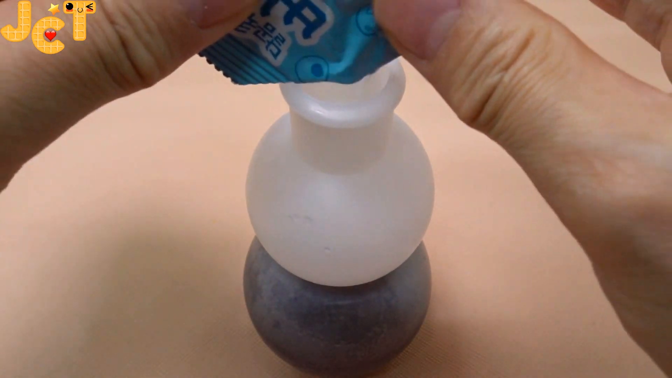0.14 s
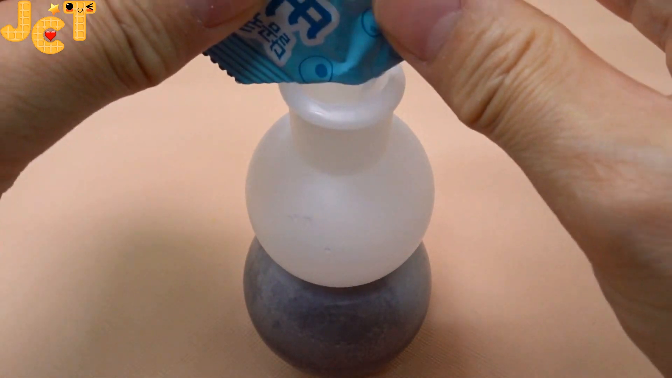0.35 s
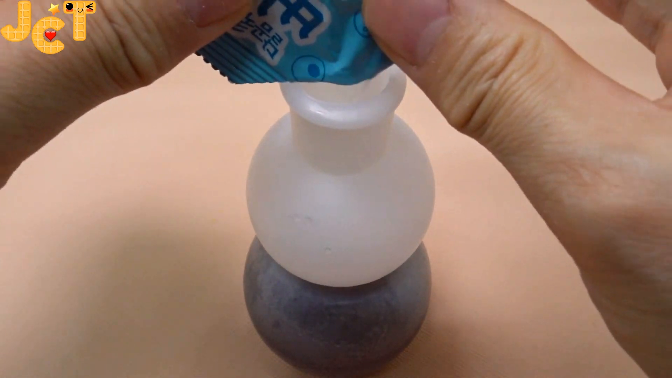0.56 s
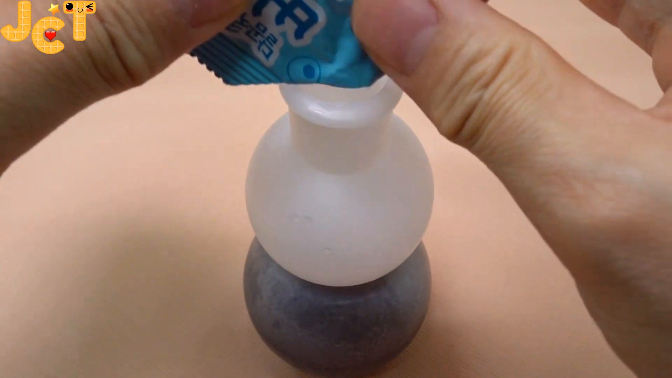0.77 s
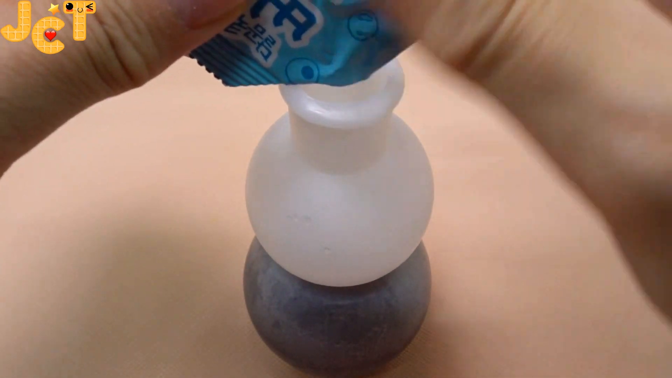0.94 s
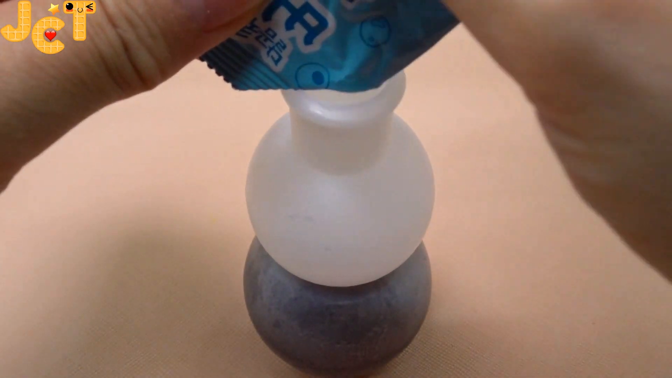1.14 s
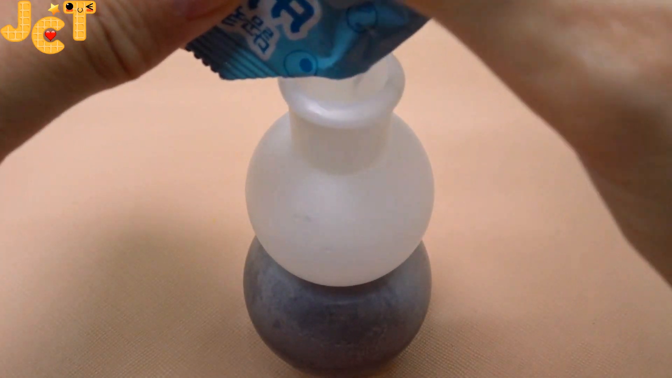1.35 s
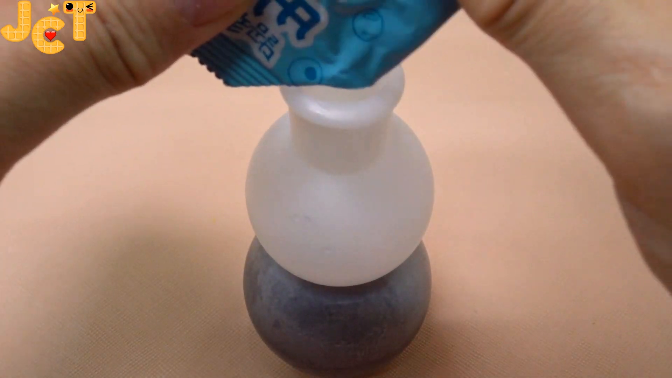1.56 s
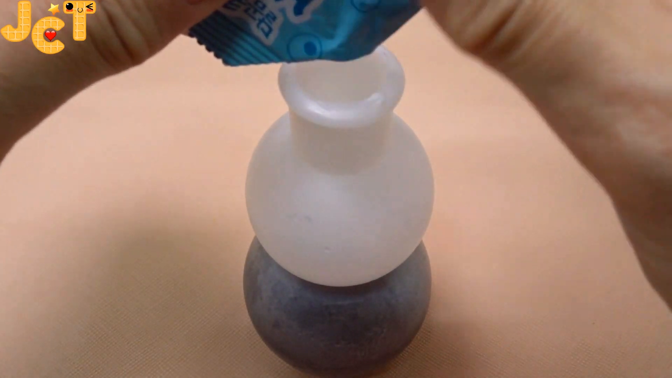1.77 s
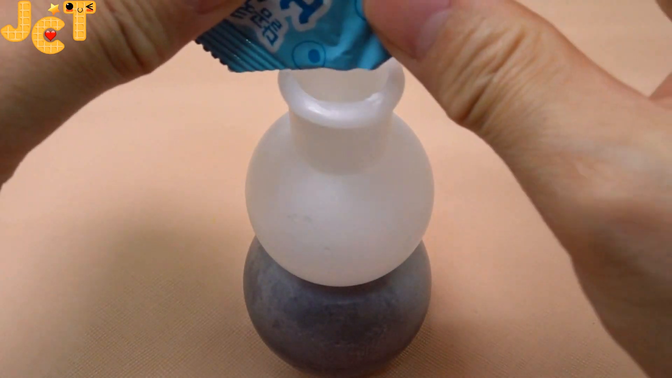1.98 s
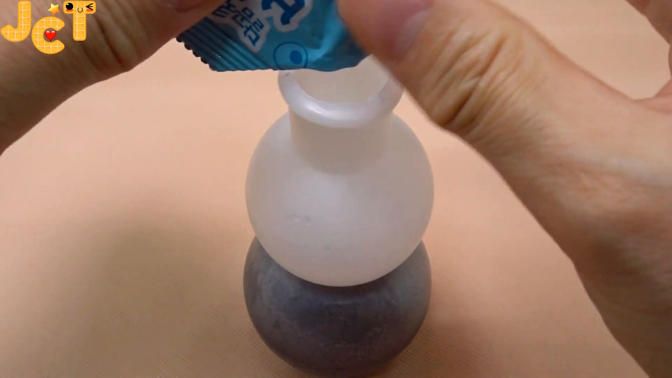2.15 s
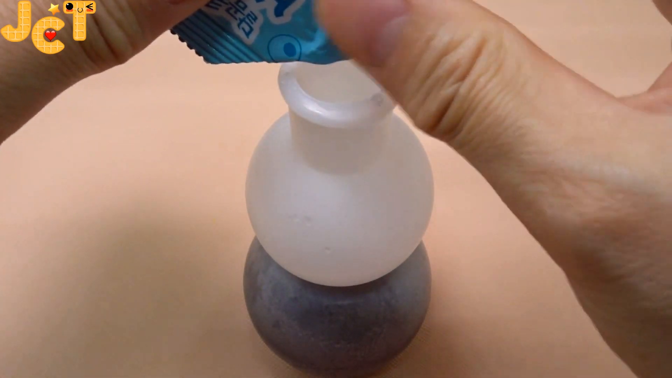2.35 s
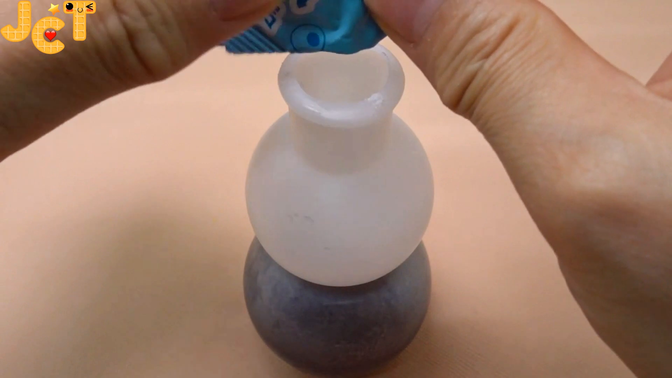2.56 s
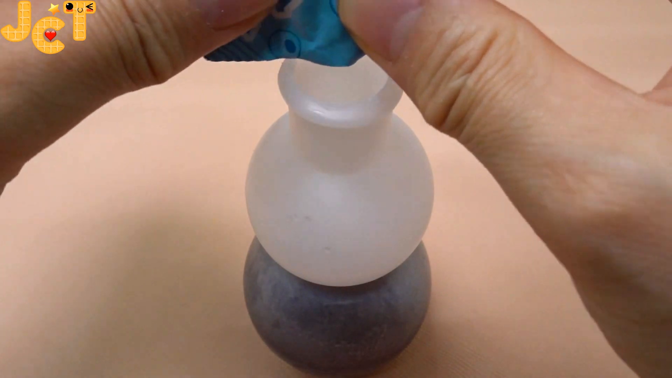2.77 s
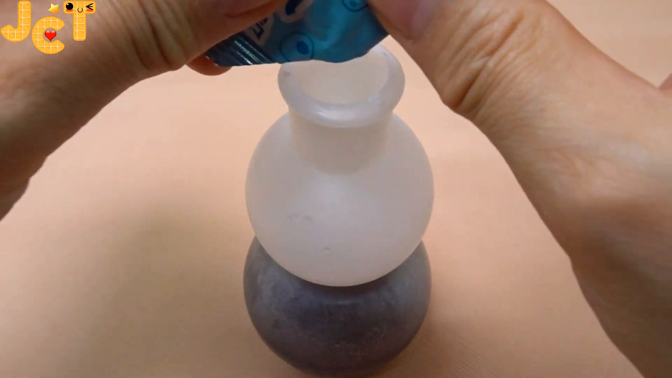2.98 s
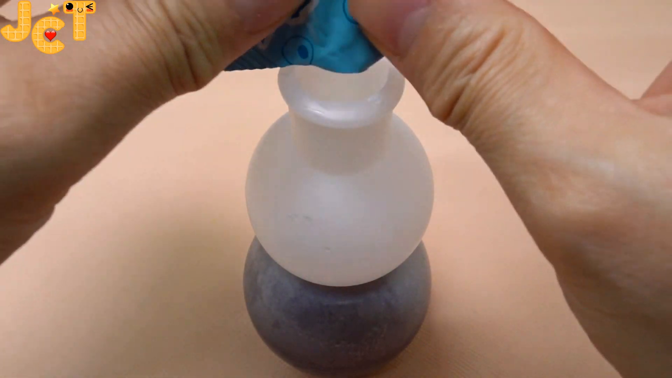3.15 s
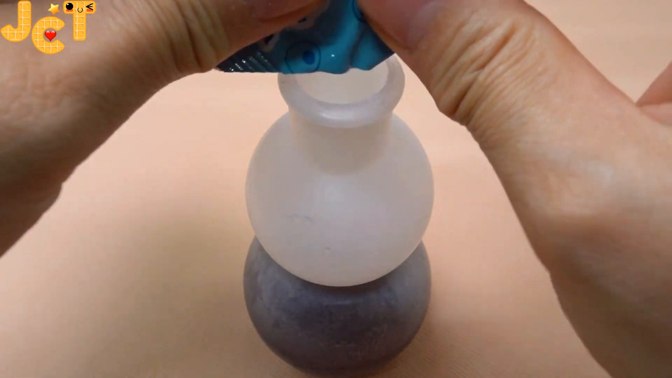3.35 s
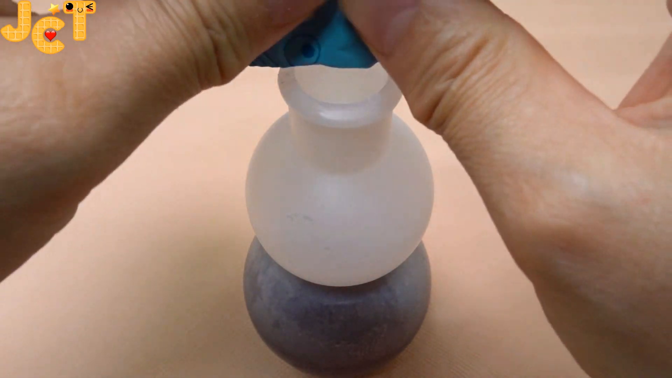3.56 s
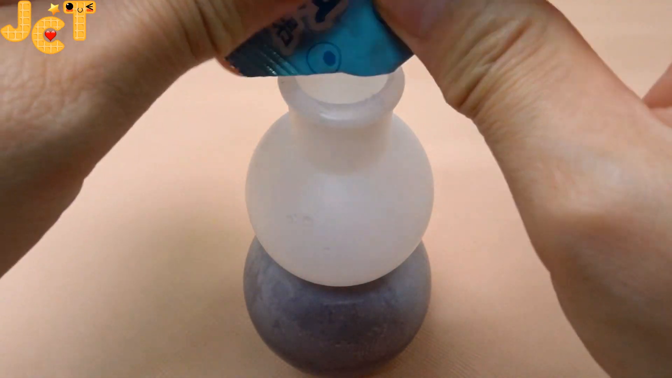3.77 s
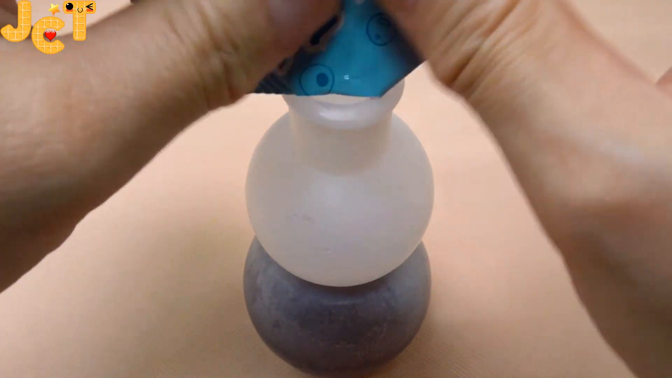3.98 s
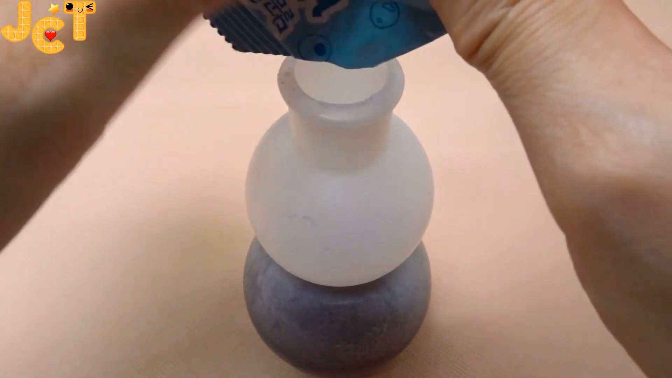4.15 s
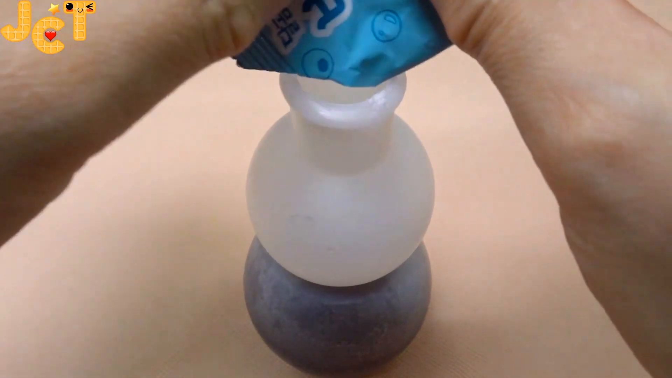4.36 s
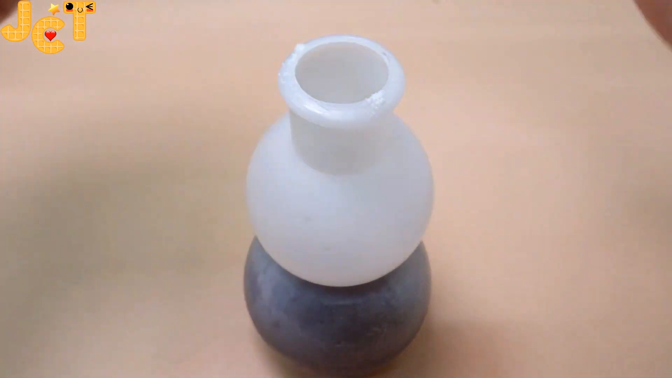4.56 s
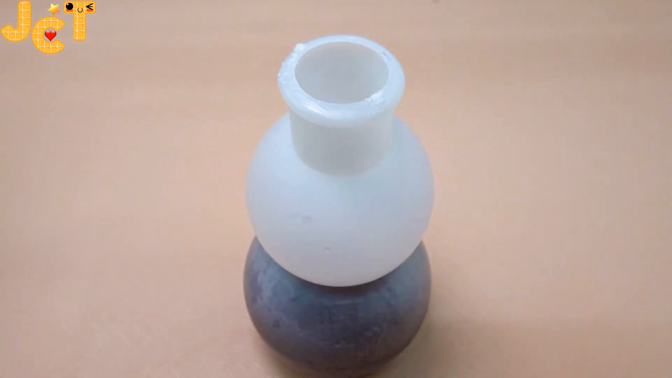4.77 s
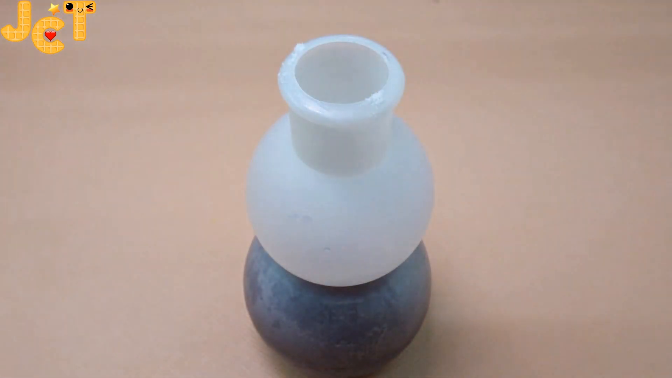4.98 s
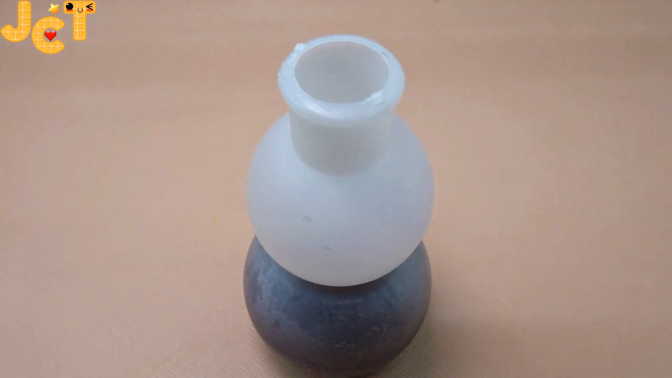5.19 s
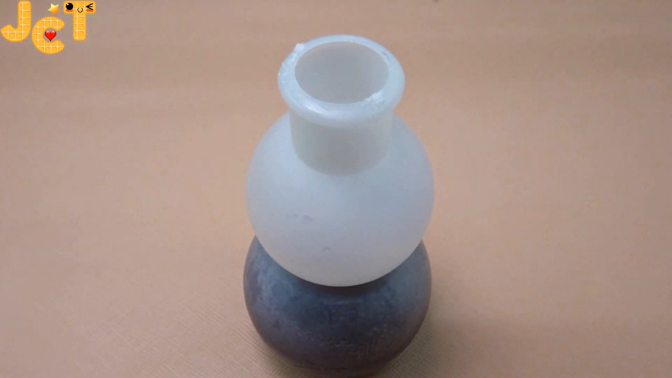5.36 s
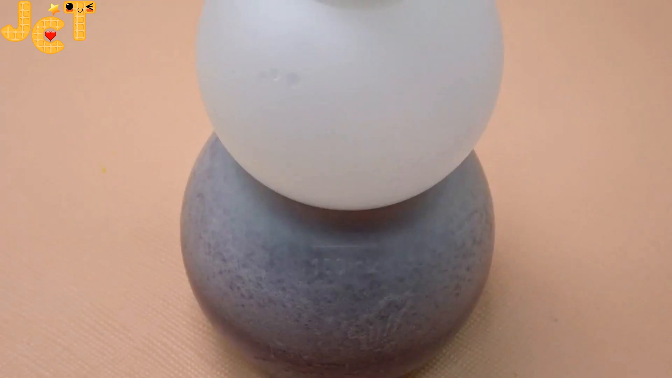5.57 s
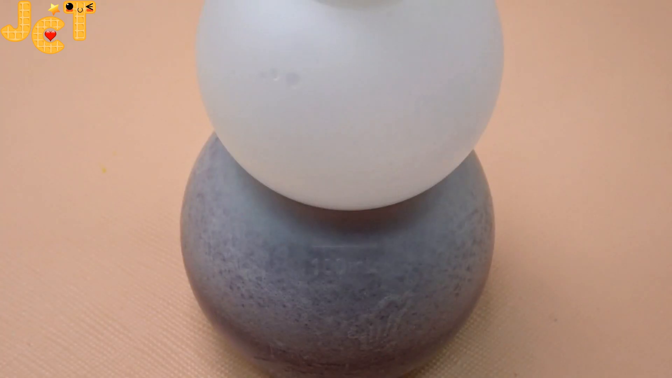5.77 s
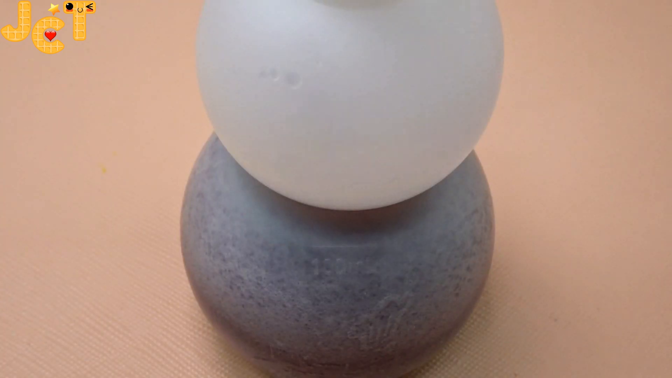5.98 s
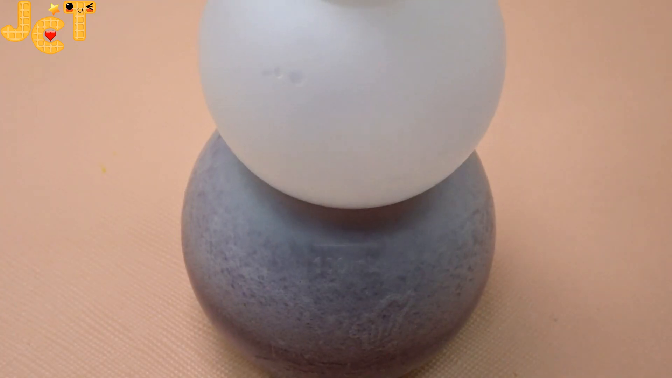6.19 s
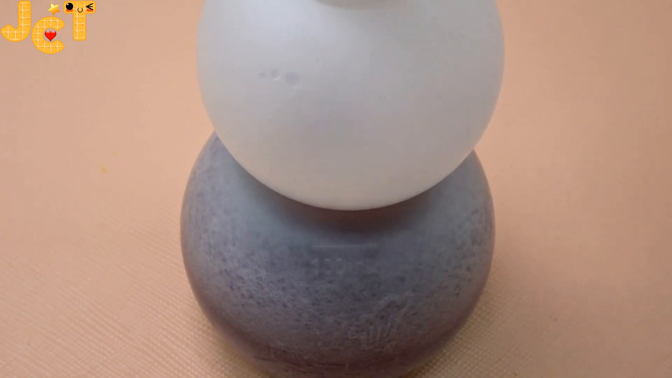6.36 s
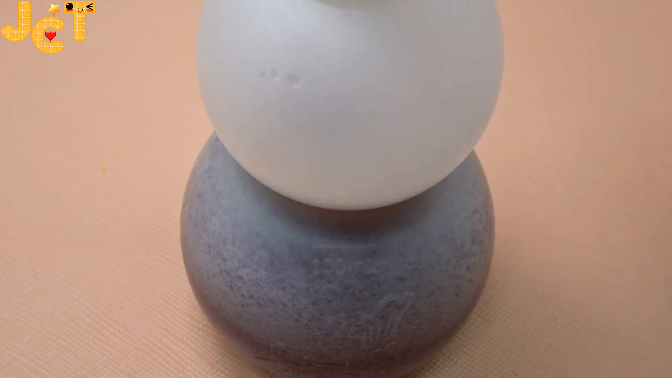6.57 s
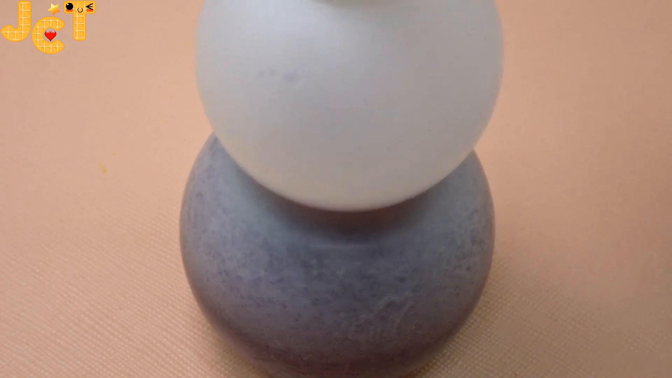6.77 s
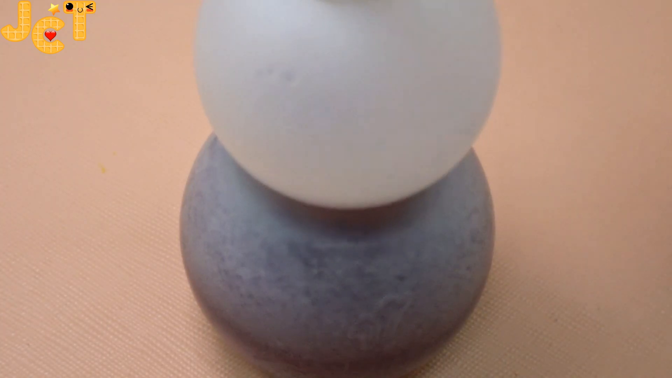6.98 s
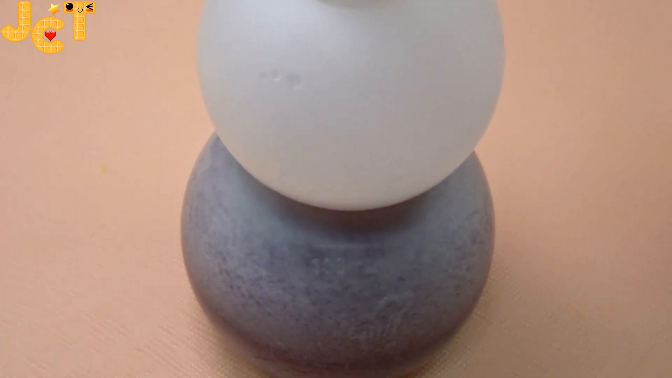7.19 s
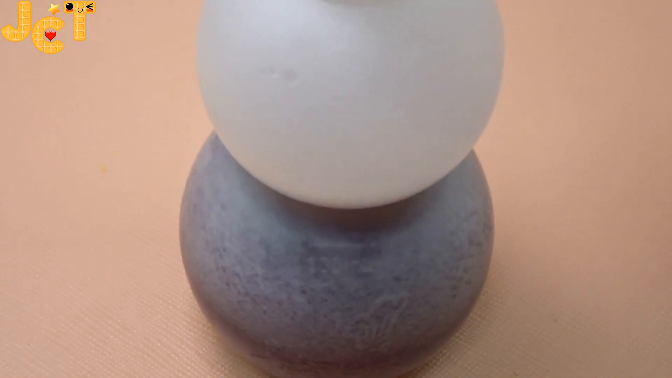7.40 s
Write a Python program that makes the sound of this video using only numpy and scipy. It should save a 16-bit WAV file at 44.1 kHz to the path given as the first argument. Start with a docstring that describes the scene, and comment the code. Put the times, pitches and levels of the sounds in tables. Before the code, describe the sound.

A plastic sachet crinkles and snaps close by as fine powder ticks into a small hollow flask, then quiet room hum with faint scrapes.

```python
"""A plastic sachet is shaken and squeezed over a small plastic flask, close to the microphones, in a quiet room.
From the start, room noise hums softly, loose powder trickles as random tiny ticks, and creases snap as short cracks.
Soon the sachet bumps the rim with damped taps, and spurts of powder ring the flask through its air resonances.
From 2.4 s small creases crackle densely until 4.5 s, and the last clear snap comes at 4.8 s.
At 5.6 s the level dips briefly; from 6 s the camera is shifted, with faint filtered scrapes and soft knocks."""
import sys
import numpy as np
from scipy import signal
from scipy.fft import rfft, irfft, next_fast_len
from scipy.io import wavfile

SR = 44100
rng = np.random.default_rng(int(sys.argv[2]) if len(sys.argv) > 2 else 0)


def to_wav(sig):
    """Store sig (one row per channel, or 1-D mono) as 16-bit WAV at the path in sys.argv[1].

    Samples outside -1..1 are clipped; the rate is SR.
    """
    pcm = np.clip(np.atleast_2d(sig), -1, 1) * 32767
    pcm = np.round(pcm).astype(np.int16)
    wavfile.write(sys.argv[1], SR, pcm.T)  # frames by channels


N = 327663
TIME = np.arange(N) / SR


def undb(db):
    """Turn decibels into gain."""
    return 10 ** (np.asarray(db) / 20)


def unit(x):
    """Scale to an rms (average strength) of 1."""
    return x / np.sqrt(np.mean(x ** 2))


def fade(t, t60):
    """Die away smoothly, losing 60 dB in t60 seconds."""
    return np.exp(-np.log(1000) * t / t60)


def add(out, s, x):
    """Mix x into out from time s."""
    i = int(np.clip(round(s * SR), 0, N - 1))
    out[..., i:i + x.shape[-1]] += x[..., :N - i]


def colour(x, points):
    """Shape the tone along (Hz, dB) points, with a filter that responds only after its input."""
    hz, db = np.transpose(points)
    size = next_fast_len(x.shape[-1] + 4096, True) // 2 * 2
    freq = np.maximum(np.arange(size // 2 + 1) * SR / size, 1)
    level_db = np.interp(np.log(freq), np.log(hz), db)
    # folding the cepstrum onto positive times keeps the response from starting early
    cepstrum = irfft(np.log(undb(level_db)))
    cepstrum[1:size // 2] *= 2
    cepstrum[size // 2 + 1:] = 0
    response = np.exp(rfft(cepstrum))
    return irfft(rfft(x, size) * response)[..., :x.shape[-1]]


def band(x, hz, width):
    """One resonance, gain 1 at its centre."""
    hz, width = min(hz, .45 * SR), min(width, .3 * SR)
    b, a = signal.iirpeak(hz, hz / width, fs=SR)
    return signal.lfilter(b, a, x)


def body(x, modes):
    """Several resonances of one object, ringing side by side."""
    return sum(undb(db) * band(x, hz, width) for hz, width, db in modes)


def stereo(mid, side, width, corner_hz):
    """Two close microphones hear the same bass but different treble."""
    b, a = signal.butter(1, min(corner_hz, SR / 3), "high", fs=SR)
    side = signal.lfilter(b, a, side)
    return mid + width * np.array([[1], [-1]]) * side


def grains(rate, spread_db):
    """Random tiny impacts of uneven size, rate per second; mean power 1 whatever their rate."""
    hit = rng.random(N) < rate / SR
    draw = rng.uniform(-1, 1, N)
    # many small grains, few large ones
    size = undb(abs(spread_db) * np.minimum(-np.log(abs(draw[hit])), 3))
    out = np.zeros(N)
    out[hit] = unit(size) * np.sign(draw[hit])
    return out * np.sqrt(SR / rate)


def knock(hz, t60, rough):
    """A soft blow: one damped swing and a dull rattle around its pitch."""
    t = np.arange(SR // 2) / SR
    noise = rng.standard_normal(len(t))
    rattle = unit(band(band(noise, hz, hz), hz, 2 * hz))
    soft_start = 1 - fade(t, 0.0013)
    return (np.sin(2 * np.pi * hz * t) + rough * rattle) * fade(t, t60) * soft_start


# tone of the still room, relative: (frequency [Hz], level [dB])
ROOM_NOISE = [(20, -17), (45, -9), (76, -8.5), (145, -2), (190, -8.5), (250, -5.5), (480, -8), (750, -14.5),
              (1300, -18), (4000, -23.5), (13000, -31.5), (16000, -45)]


def air(noise_db=-54.5, hum_hz=143, hum_db=-76, apart_db=-18):
    """Steady room noise is filtered hiss; a narrow resonance of noise makes a faint, unsteady hum."""
    mid, side, left, right = colour(rng.standard_normal((4, N)), ROOM_NOISE)
    # a little noise is separate in each microphone
    noise = stereo(mid, side, width=1.0, corner_hz=1700) + undb(apart_db) * np.array([left, right])
    hum = unit(band(band(rng.standard_normal(N), hum_hz, 10), hum_hz, 10))
    return undb(noise_db) * unit(noise) + undb(hum_db) * hum


# larger spurts of powder and rustling film, levels before each player's trim:
# (time [s], length [s], crackle level [dB], flask ring level [dB])
LARGE_SPURTS = [(0.314, 0.073, -45.5, -46), (0.736, 0.047, -43.5, -49), (1.043, 0.019, -34, -27.5),
                (1.317, 0.087, -40.5, -36), (1.451, 0.013, -24.5, -32), (1.744, 0.054, -30.5, -30.5),
                (1.91, 0.015, -28, -28), (1.97, 0.032, -41, -61), (2.071, 0.046, -39, -40),
                (2.265, 0.03, -35.5, -29.5), (2.372, 0.033, -42, -50), (2.493, 0.012, -32.5, -36),
                (2.85, 0.076, -34.5, -36), (3.025, 0.07, -37.5, -49.5), (3.115, 0.021, -28.5, -43),
                (3.217, 0.012, -25, -49), (3.26, 0.029, -24.5, -49), (3.353, 0.03, -31, -56),
                (3.511, 0.025, -37.5, -52.5), (3.582, 0.094, -36.5, -60), (3.803, 0.11, -39.5, -53.5),
                (3.933, 0.06, -30, -58.5), (4.046, 0.075, -30.5, -40), (4.144, 0.067, -25, -26.5),
                (4.199, 0.03, -27.5, -33.5), (4.365, 0.05, -35, -46), (4.45, 0.057, -30.5, -51),
                (4.575, 0.029, -36, -28)]


def spurts(lag_s=0.00402, length_s=0.01986, spill_db=-5, spill_ring_db=-5.0):
    """Powder slides in large spurts; each bump also shakes loose a small one to match its strength."""
    small = [(s + lag_s, length_s, db + spill_db, db + spill_ring_db) for s, db, _ in RIM_BUMPS]
    return list(LARGE_SPURTS) + small


def swell(t, length):
    """Strength of one shake around its peak: a quick rise and fall."""
    return np.exp(-np.minimum(abs(1.8 * t / length), 20) ** 1.5)


# powder trickling between the spurts: (time [s], level [dB])
TRICKLE_LEVEL = [(0, -62), (1.15, -56.5), (1.6, -83.5), (2.45, -65), (2.8, -47.5), (3.15, -57),
                 (3.6, -47.5), (4.3, -57.5), (4.7, -55), (4.85, -77.5)]
# tone of the powder's crackle, relative: (frequency [Hz], level [dB])
CRACKLE_TONE = [(60, -23.5), (250, 0), (700, -20.5), (1200, -7.5), (1800, -4), (2700, -0.5), (4200, 0),
                (6500, -2.5), (10000, -1), (13000, -6.5), (16000, -19)]
# air resonances of the flask, the first one in its neck: (frequency [Hz], width [Hz], relative level [dB])
FLASK_AIR = [(890.5, 168, 8), (1510, 174, 6), (2035, 270, 5), (2487, 200, -6), (2965, 340, 0.5),
             (3950, 510, -10.5), (4830, 85, -26)]


def powder(crackle_db=-3.5, ring_db=-6, bed_db=-13, full_rate=2200, own_db=1):
    """Grains slide over the film and patter into the flask, where they stir the air in its neck."""
    # flow and stir are powers: of the crackle, and of the patter in the flask
    flow = undb(np.interp(TIME, *np.transpose(TRICKLE_LEVEL))) ** 2
    stir = np.zeros(N)
    for s, length, db, flask_db in spurts():
        span = slice(max(int((s - .25) * SR), 0), int((s + .25) * SR))
        shake = swell(TIME[span] - s, length) ** 2
        flow[span] += shake * undb(db + crackle_db) ** 2
        stir[span] += shake * undb(flask_db + ring_db) ** 2
    # a thin trickle is single ticks, a full flow a dense crackle
    rate = full_rate * np.clip(flow / undb(-36.5) ** 2, 1e-4, 1) ** .33
    layers = []
    for _ in range(2):
        # grains of different sizes tick at different pitches
        ticks = np.zeros(N)
        for hz in np.geomspace(1600, 13000, num=6):
            ticks += unit(band(grains(rate / 3, spread_db=4), hz, hz / 4)) * np.sqrt(hz)
        clicks = grains(rate, spread_db=0.5)
        hiss = undb(bed_db) * rng.standard_normal(N)
        layers.append(clicks + undb(own_db) * unit(ticks) + hiss)
    crackle = colour(stereo(*layers, width=0.23, corner_hz=4500), CRACKLE_TONE)
    crackle = unit(crackle) * np.sqrt(flow)
    hz, width, _ = FLASK_AIR[0]
    patter = grains(rate=2500, spread_db=6.5)
    neck = band(patter * np.sqrt(stir), hz, width) / np.std(band(patter, hz, width))
    return crackle, neck


# tone of the room's echo, relative: (frequency [Hz], level [dB])
ECHO_TONE = [(100, -1.5), (300, 5), (800, 2.5), (3000, -5.5), (7000, -8), (16000, -5.5)]


def room(x, wet_db=-18.5, t60=0.47):
    """Walls a few metres off return a soft, late echo, diffuse in the treble."""
    t = np.arange(int(.6 * SR)) / SR
    tail = stereo(*colour(rng.standard_normal((2, len(t))), ECHO_TONE), width=1, corner_hz=454)
    tail *= fade(t, t60) * (1 - fade(t, 0.063))
    tail *= undb(wet_db) / np.sqrt(np.sum(tail ** 2) / 2)
    return signal.fftconvolve(x, tail, axes=1)[:, :N]


# the clearest creases snapping: (time [s], level before the crack's trim [dB], pitch of the facet [Hz])
CLEAR_SNAPS = [(0.0155, -27.5, 4000), (0.1011, -37.5, 3650), (0.1528, -39, 3630), (0.207, -26, 8260),
               (0.2875, -30, 4000), (0.3005, -32, 4100), (0.3262, -24, 8700), (0.399, -34, 5260),
               (0.4119, -23, 6600), (0.494, -32.5, 2130), (0.5179, -26, 10000), (0.5263, -23.5, 4840),
               (0.623, -24, 5240), (0.6332, -29.5, 8550), (0.6545, -24.5, 6950), (0.707, -28.5, 6540),
               (0.747, -23.5, 5950), (0.8459, -19, 10600), (0.8822, -27, 6800), (0.9092, -30, 8240),
               (1.027, -35, 10600), (1.0416, -24, 11100), (1.2674, -28, 4000), (1.2747, -27.5, 1860),
               (1.2789, -25, 5830), (1.3014, -24, 8400), (1.35, -39.5, 2100), (1.4414, -30, 10300),
               (1.4514, -20, 6400), (1.7133, -27, 8200), (1.734, -20.5, 8260), (1.7668, -17.5, 10100),
               (1.787, -23, 3900), (1.8057, -19.5, 3240), (1.903, -21, 11900), (1.9108, -18, 13000),
               (1.9252, -24.5, 11900), (1.9815, -25.5, 7100), (1.994, -24.5, 7100), (2.0284, -23, 4500),
               (2.0505, -18.5, 11700), (2.0887, -13.5, 8800), (2.105, -30, 1400), (2.177, -45, 4970),
               (2.2794, -18.5, 9400), (2.35, -30, 10800), (2.446, -42.5, 7060), (2.4915, -21, 9700),
               (2.5232, -30, 6250), (2.5714, -25.5, 7550), (2.625, -30, 6860), (2.6756, -25, 5200),
               (2.7087, -23.5, 9900), (2.7785, -21.5, 4160), (2.8221, -19.5, 4900), (2.8452, -20, 4500),
               (2.8766, -19.5, 6800), (2.889, -24.5, 6400), (2.9337, -28.5, 4500), (2.9518, -22, 11900),
               (2.9779, -20, 9000), (2.9988, -18, 7500), (3.0113, -13.5, 3900), (3.0347, -15.5, 2600),
               (3.05, -22, 5000), (3.101, -25, 10100), (3.12, -15.5, 11300), (3.22, -16, 4500),
               (3.264, -17.5, 3350), (3.27, -18.5, 7560), (3.2963, -26, 3400), (3.337, -25.5, 10600),
               (3.362, -12.5, 6560), (3.3884, -16.5, 2680), (3.437, -16.5, 9700), (3.4586, -17.5, 4950),
               (3.505, -20.5, 3950), (3.5124, -24, 2880), (3.568, -18, 7250), (3.5914, -15, 8900),
               (3.5991, -16.5, 9200), (3.6139, -17.5, 12000), (3.6386, -22, 3900), (3.674, -22, 6840),
               (3.691, -21, 3750), (3.7541, -24, 5000), (3.7903, -22, 5400), (3.8031, -21, 8700),
               (3.8347, -29, 8900), (3.857, -24.5, 5700), (3.9112, -16, 6660), (3.9278, -18, 7630),
               (3.9476, -13, 9400), (4.0218, -19, 3840), (4.0492, -16, 4030), (4.0688, -15.5, 9050),
               (4.102, -12, 9100), (4.135, -12, 6900), (4.1423, -15.5, 3970), (4.1562, -16.5, 4430),
               (4.186, -15, 8650), (4.2307, -22, 6150), (4.2751, -18.5, 4750), (4.341, -14.5, 10000),
               (4.3654, -16.5, 7000), (4.374, -18.5, 8700), (4.4084, -21.5, 10600), (4.4291, -21.5, 4840),
               (4.4542, -16, 3020), (4.4962, -23, 5700), (4.5804, -25, 3930), (4.6767, -43.5, 4900),
               (4.803, -39, 5800)]


def creases(count=2, lag_s=.001, spread_s=.0055, neighbour_db=-12.5, uneven_db=3.5, spurt_db=0,
            squeeze_db=-38, squeeze_s=(2.4, 4.51), small_hz=6800, octaves=.6, size=60):
    """Snaps set off weaker neighbours; small creases give way in every large spurt and all through the squeeze."""
    def pitch(chance):
        """A random pitch for a small crease."""
        return np.clip(small_hz * 2 ** (octaves * chance), 1400, 13000)

    rows = list(CLEAR_SNAPS)
    for (s, db, _), draws in zip(CLEAR_SNAPS, rng.standard_normal((len(CLEAR_SNAPS), count, 3))):
        for a, b, c in draws:
            near_s = max(s + lag_s + spread_s * a, spread_s)
            rows.append((near_s, db + neighbour_db + uneven_db * b, pitch(c)))
    for (s, length, db, _), draws in zip(LARGE_SPURTS, rng.standard_normal((len(LARGE_SPURTS), count, 3))):
        for a, b, c in draws:
            rows.append((s + length / 2 * np.tanh(a), db + spurt_db + uneven_db * b, pitch(c)))
    # the squeeze spreads its creases almost evenly
    for k, (a, b, c) in enumerate(rng.standard_normal((size, 3))):
        s = np.interp(k + a / 2, (0, size), squeeze_s)
        rows.append((s, squeeze_db + uneven_db * b, pitch(c)))
    return rows


# tone of the fluttering film sheet, relative: (frequency [Hz], level [dB])
SHEET_TONE = [(150, -14.5), (500, -8.5), (1100, -1.5), (1800, -8.5), (2800, -3.5), (4200, -1.5),
              (6500, -4.5), (10000, -2.5), (13000, -2), (16000, -15.5)]
# a snap at SNAP_DB has flutter at FLUTTER_DB beside it; harder snaps are drier (dB of flutter lost per dB)
SNAP_DB, FLUTTER_DB, DRYNESS = -22, -2, 0.27
FILM_PAN_DB = 1.1  # the film leans this much to the left on average


def snaps(damping=0.82, film_hz=11000, flutter_t60=0.025, facet_db=0, facet_width=0.16, snap_db=3.0,
          creak_db=-4, scatter_db=6.0):
    """A crease creaks as it buckles, gives one sharp crack, and the sheet flutters on for some milliseconds."""
    out, t = np.zeros((2, N)), np.arange(2048) / SR
    sheet = colour(rng.standard_normal((2, N // 4)), SHEET_TONE)
    sheet = unit(stereo(*sheet, width=0.54, corner_hz=5600))
    pulse = colour(1. * (t == 0), [(200, -2.5), (1500, -0.5), (14000, -2), (16500, -3.5), (18000, -12.0)])
    rows = creases()
    for (s, db, hz), (start, sign, pan, shape) in zip(rows, rng.random((len(rows), 4))):
        i = int(start * (N // 4 - len(t)))
        flutter = sheet[:, i:i + len(t)]
        # every facet has its own pitch and, by its shape, its own overtone
        facet = unit(band(flutter, hz, facet_width * hz))
        overtone = unit(band(flutter, min(hz * (1.3 + shape), 15000), facet_width * hz))
        # the crack's pitch lies between facet and film; it bounces between the folds for a few milliseconds
        crack_hz = np.sqrt(hz * film_hz)
        rattle = unit(band(flutter, crack_hz, crack_hz) + .4 * facet) * fade(t, .0035)
        click = np.sign(sign - .5) * unit(band(pulse, crack_hz, damping * crack_hz))
        crack = unit(click + unit(rattle))
        # as much energy as one millisecond of steady sound
        crack = undb(snap_db) * crack * np.sqrt(SR / 1000 / len(t))
        flutter = unit(flutter + undb(facet_db) * (facet + .5 * overtone))
        flutter = undb(FLUTTER_DB - DRYNESS * (db - SNAP_DB)) * flutter
        pan_db = FILM_PAN_DB + scatter_db * (2 * pan - 1)
        gain = undb(db + np.array([[.5], [-.5]]) * pan_db)
        add(out, s, gain * (crack + flutter * fade(t, flutter_t60)))
        # the creak grows until the crack
        lead = min(len(t), int(s * SR))
        creak = (flutter * fade(t[::-1], 0.0096))[:, -lead:]
        add(out, s - lead / SR, gain * undb(creak_db) * creak)
    return out


# shakes that bump the sachet against the flask: (time [s], level before trims [dB], pitch [Hz])
RIM_BUMPS = [(0.093, -41, 400), (0.199, -39, 355), (0.281, -39, 410), (0.411, -36, 374), (0.431, -44, 380),
             (0.477, -41.5, 390), (0.631, -41, 306), (0.686, -45, 424), (0.842, -33.5, 397),
             (0.914, -37, 552), (1.048, -39, 316), (1.091, -38, 302), (1.276, -37.5, 472),
             (1.454, -36, 437), (1.749, -36.5, 510), (1.805, -40, 426), (1.913, -31, 428),
             (1.983, -38.5, 335), (2.053, -38.5, 496), (2.134, -39.5, 280), (2.268, -36, 300),
             (2.346, -41.5, 420), (2.493, -31, 325), (2.56, -34, 368), (2.719, -32.5, 316),
             (2.772, -39, 288), (3.011, -35, 363), (4.193, -30, 395), (4.589, -34, 295)]


def bumps(bump_db=4.0, t60=0.055, thud_db=-11, thud_hz=240, rustle_db=-1, rustle_t60=0.035):
    """Dull taps of the sachet against the rim; the flask thuds on the table below and the film rustles."""
    out, t = np.zeros(N), np.arange(SR // 2) / SR
    for s, db, hz in RIM_BUMPS:
        tap = knock(hz, t60, rough=1.0)
        thud = undb(thud_db) * knock(thud_hz, t60, rough=1)
        rustle = unit(colour(rng.standard_normal(len(t)), SHEET_TONE)) * fade(t, rustle_t60)
        add(out, s - .002, undb(db + bump_db) * (tap + thud) + undb(db + rustle_db) * rustle)
    return out


def puffs(puff_db=2, t60=0.057):
    """Each spurt pushes the air in the neck once, which gives a short hollow note."""
    out, t = np.zeros(N), np.arange(SR // 8) / SR
    neck_hz = FLASK_AIR[0][0]
    note = np.sin(2 * np.pi * neck_hz * t) * fade(t, t60) * (1 - fade(t, 0.0046))
    for s, length, _, flask_db in spurts():
        add(out, s - length / 6, undb(flask_db + puff_db) * note)
    return out


# fingers scraping on the camera: (time [s], length [s], level before trim [dB], pitch of the rasp [Hz])
CAMERA_SCRAPES = [(6.018, 0.025, -60.5, 5170), (6.346, 0.017, -52.5, 5270), (6.372, 0.073, -53, 4870),
                  (6.468, 0.0086, -48, 5000), (6.63, 0.065, -54.5, 4970), (6.771, 0.0062, -50, 5000),
                  (6.828, 0.0053, -50, 5070), (6.947, 0.0061, -53.5, 5600), (6.993, .015, -54.5, 5060),
                  (7.052, 0.027, -54, 5200), (7.13, 0.033, -49.5, 5080), (7.235, 0.032, -44.5, 5260),
                  (7.318, 0.033, -51, 5070)]
# resonances of its casing: (frequency [Hz], width [Hz], relative level [dB])
CASING_RINGS = [(887, 330, 3.5), (1720, 2000, -11.5), (5700, 1900, -5), (7800, 1100, -14), (9930, 590, -6),
                (11400, 550, -12)]
# soft knocks on the camera and its stand: (time [s], level [dB], pitch [Hz], time to fade by 60 dB [s])
CAMERA_KNOCKS = [(6.35, -43, 345, 0.072), (6.779, -45, 332, 0.094), (6.834, -34, 874, 0.085),
                 (6.955, -42.5, 850, 0.082), (7.061, -36, 1090, 0.035), (7.059, -37.5, 1900, 0.021),
                 (7.061, -36, 420, 0.018), (6.96, -46, 93, .2), (7.264, -47, 570, 0.28),
                 (7.37, -48, 570, 0.48)]


def handling(scrape_db=4.5, release_t60=0.11, casing_db=3, rasp_width_hz=330):
    """Skin sticks and slips on the camera's casing with a thin rasp; camera and stand knock faintly."""
    out, t = np.zeros((2, N)), np.arange(SR // 4) / SR
    slips = stereo(*(grains(rate=700, spread_db=4) for _ in range(2)), width=.6, corner_hz=2500)
    for s, length, db, hz in CAMERA_SCRAPES:
        i = int(np.clip(s * SR, 0, N - 1))
        slip = np.roll(slips, -i, axis=1)[:, :len(t)]
        rasp = unit(band(band(slip, hz, rasp_width_hz), hz, 1350))
        scrape = unit(rasp + undb(casing_db) * unit(body(slip, CASING_RINGS)))
        # the grip builds up, then lets go
        grip = (1 - fade(t, length / 2)) * fade(np.maximum(t - length, 0), release_t60)
        add(out, s, undb(db + scrape_db) * scrape * grip)
    for s, db, hz, t60 in CAMERA_KNOCKS:
        # short knocks are rough, long rings clean
        add(out, s, undb(db) * knock(hz, t60, rough=min(.022 / t60, 1)))
    return out


def scene(flask_db=-4):
    """Film and powder sound just above the flask's mouth, so both ring it."""
    crackle, neck = powder()
    film_and_powder = snaps() + crackle
    flask = undb(flask_db) * body(film_and_powder.mean(axis=0), FLASK_AIR)
    near = film_and_powder + flask + neck + puffs() + bumps() + handling()
    return near + room(near) + air()


# the level dips briefly: (time [s], level [dB])
LEVEL_DIP = [(5.588, -9), (5.601, -39), (5.628, -23), (5.642, -10)]
TOP_HZ = 16100  # nothing is left much above this


def record(dry):
    """The microphones lose the deepest bass, the level dips briefly once, and the top is cut."""
    no_rumble = signal.sosfilt(signal.butter(2, 50, "high", fs=SR, output="sos"), dry)
    dip = undb(np.interp(TIME, *np.transpose(LEVEL_DIP)))
    top_cut = signal.ellip(8, .2, 70, TOP_HZ, fs=SR, output="sos")
    return signal.sosfilt(top_cut, no_rumble * dip)


dry = scene()
out = record(dry)
to_wav(out)
```